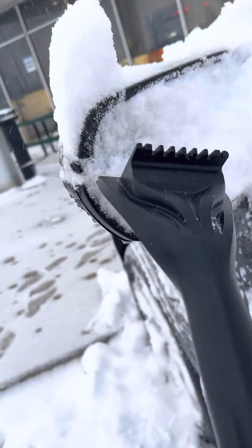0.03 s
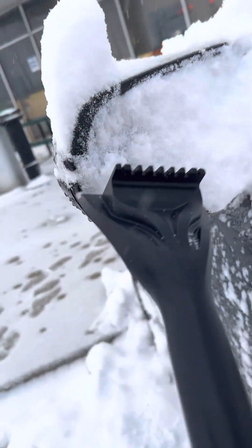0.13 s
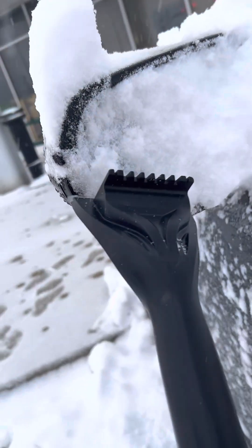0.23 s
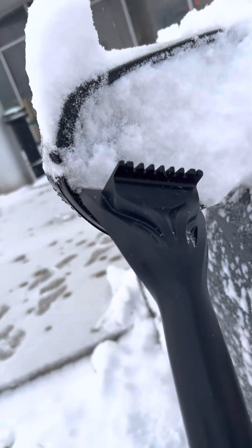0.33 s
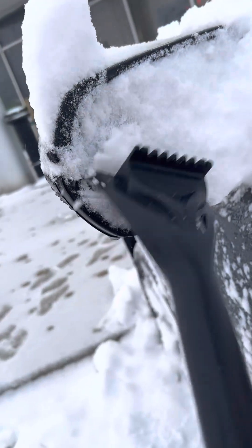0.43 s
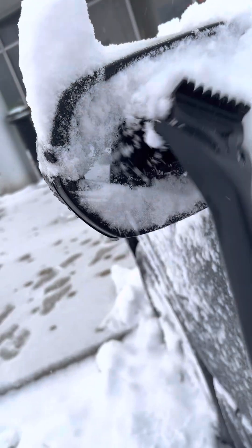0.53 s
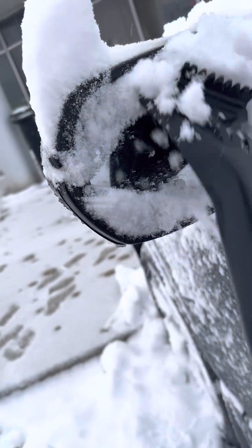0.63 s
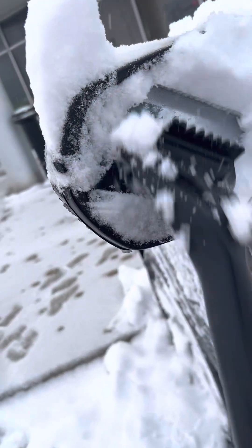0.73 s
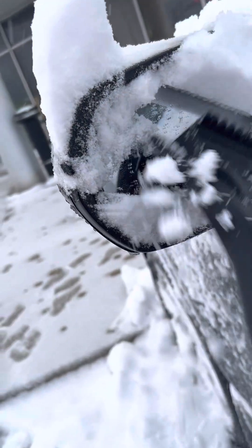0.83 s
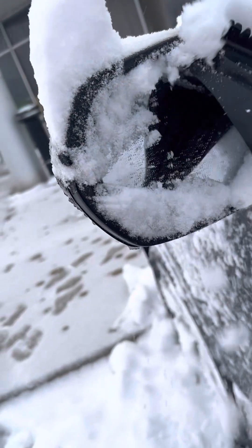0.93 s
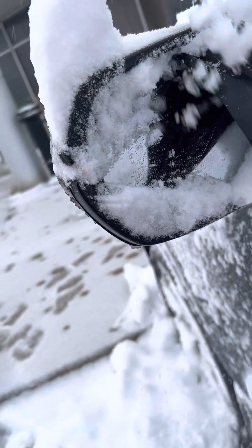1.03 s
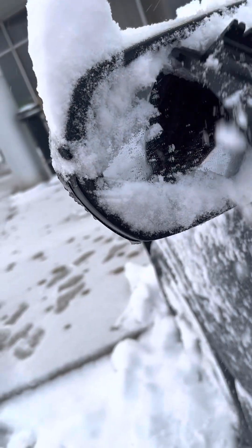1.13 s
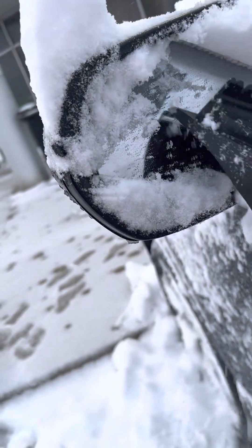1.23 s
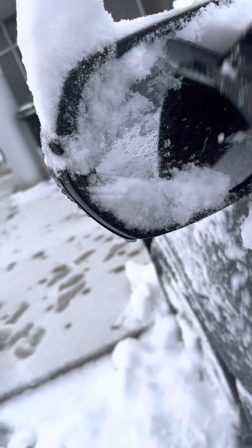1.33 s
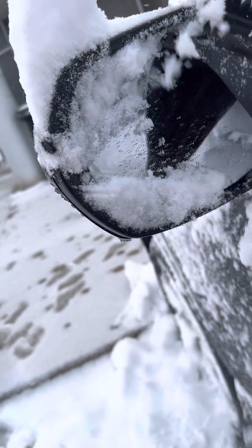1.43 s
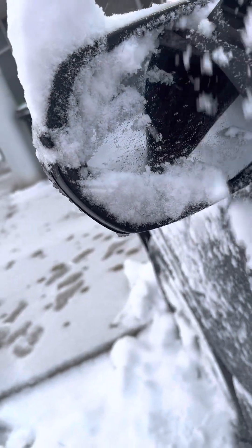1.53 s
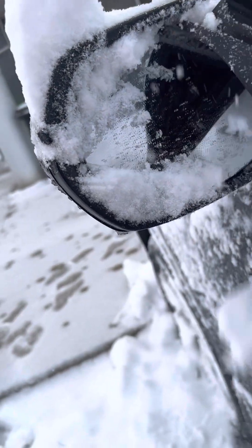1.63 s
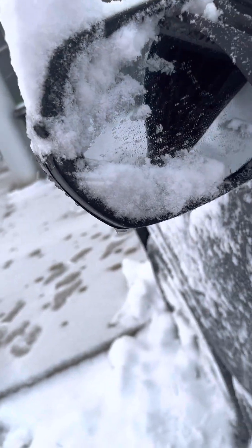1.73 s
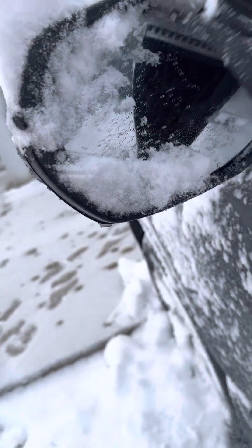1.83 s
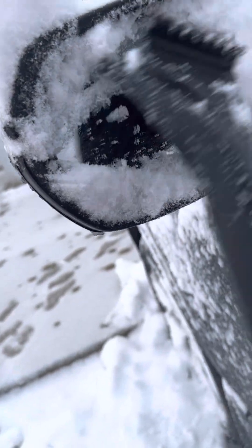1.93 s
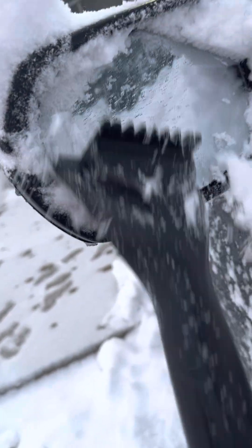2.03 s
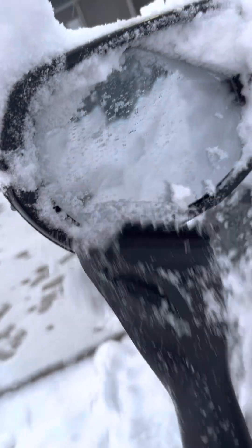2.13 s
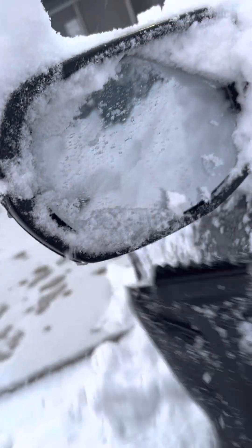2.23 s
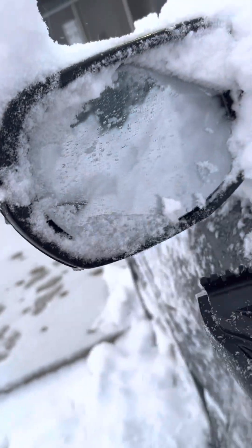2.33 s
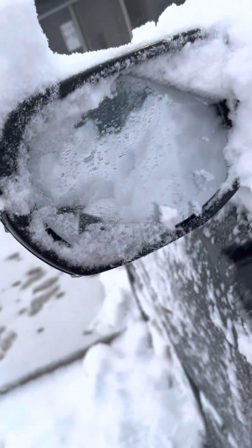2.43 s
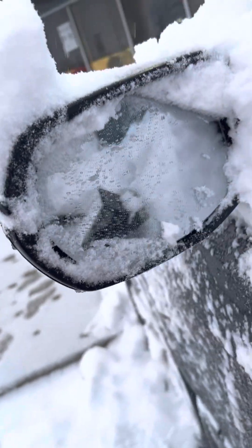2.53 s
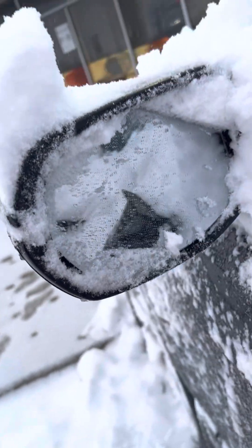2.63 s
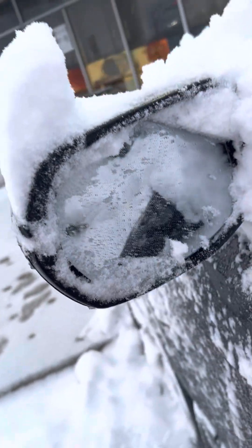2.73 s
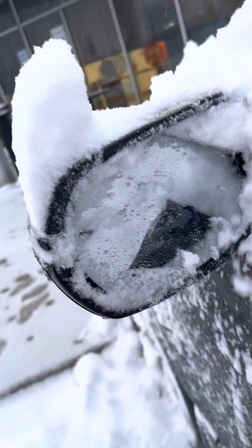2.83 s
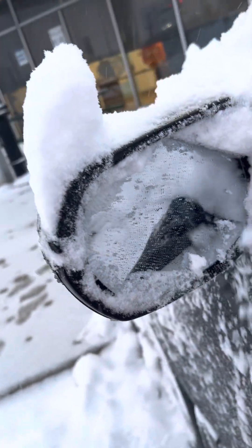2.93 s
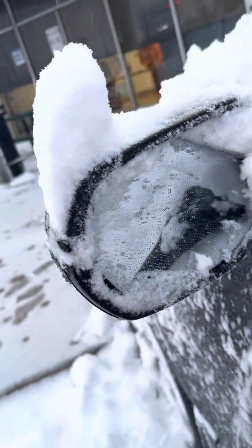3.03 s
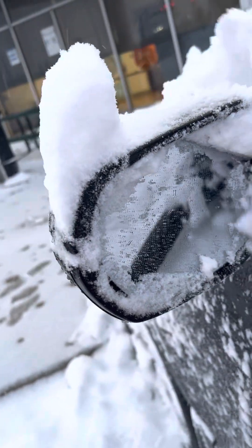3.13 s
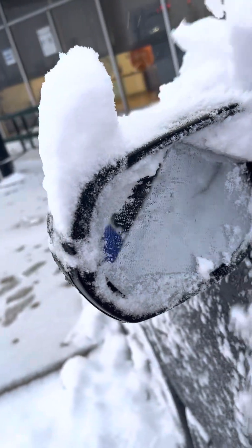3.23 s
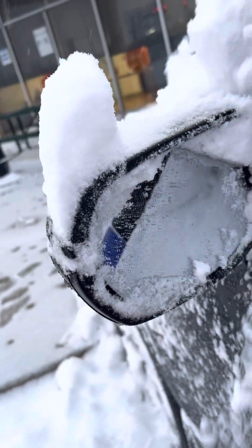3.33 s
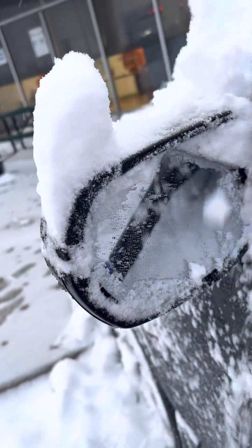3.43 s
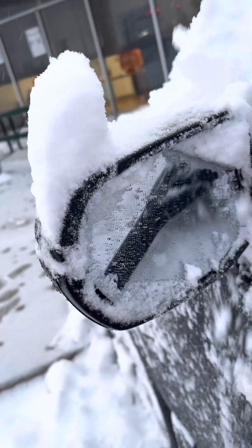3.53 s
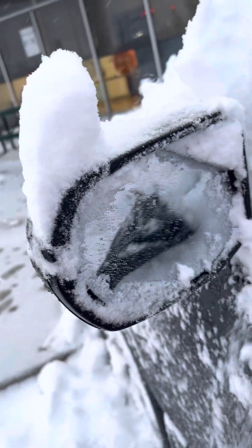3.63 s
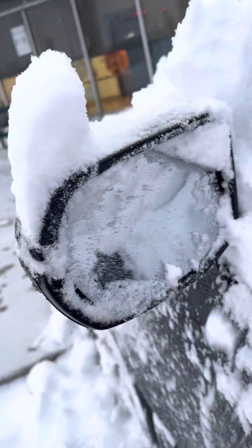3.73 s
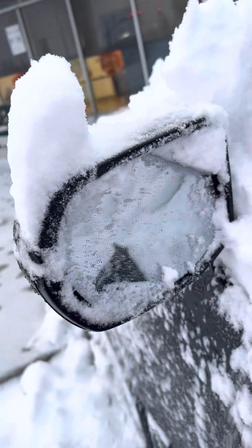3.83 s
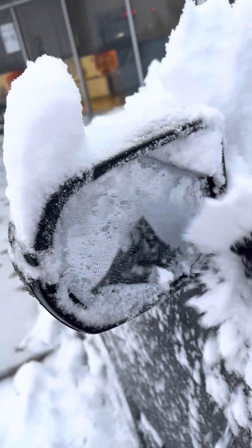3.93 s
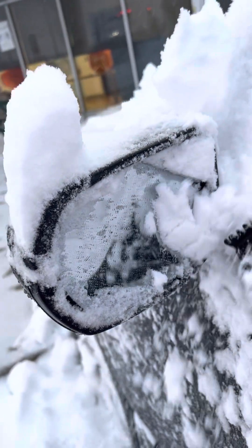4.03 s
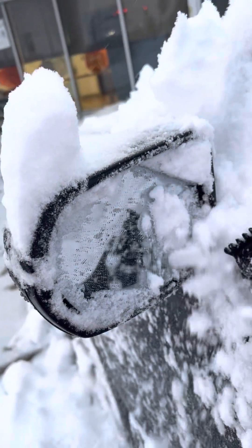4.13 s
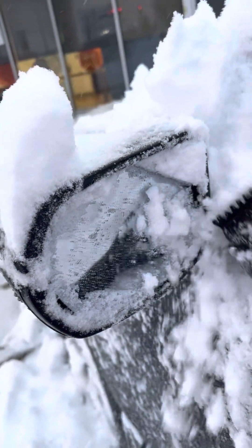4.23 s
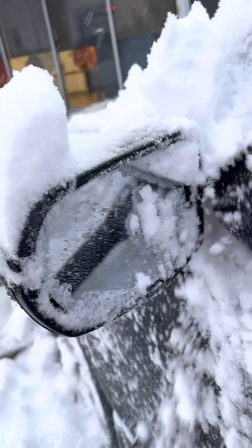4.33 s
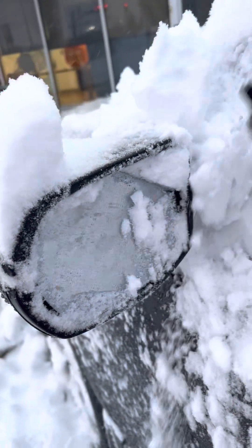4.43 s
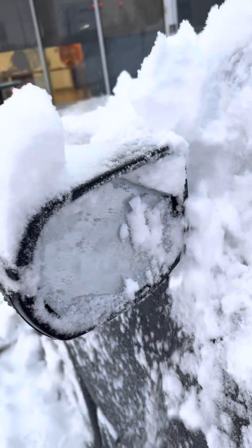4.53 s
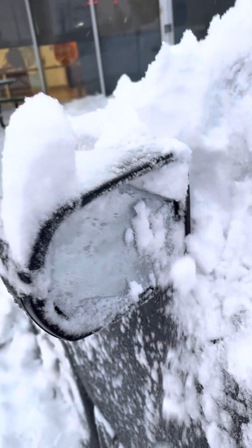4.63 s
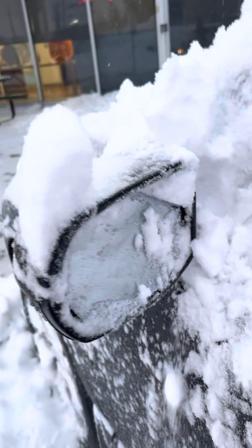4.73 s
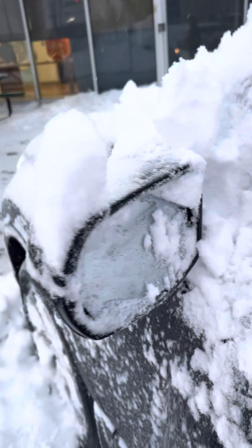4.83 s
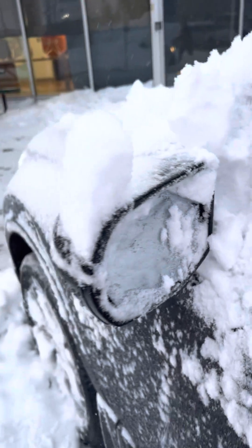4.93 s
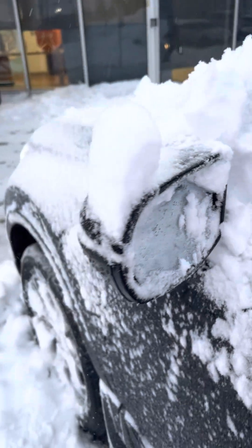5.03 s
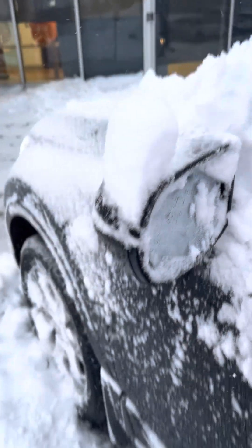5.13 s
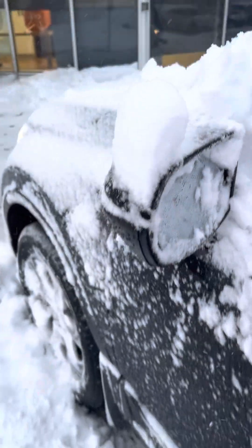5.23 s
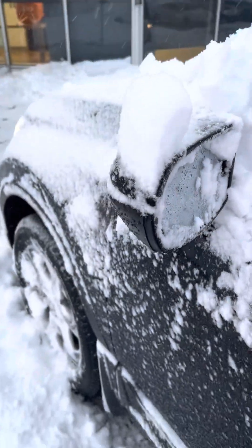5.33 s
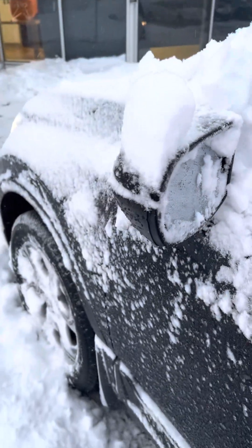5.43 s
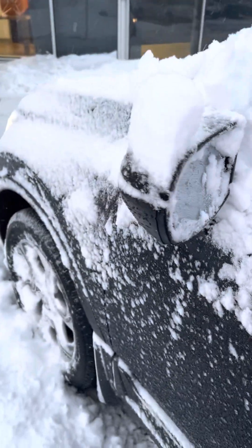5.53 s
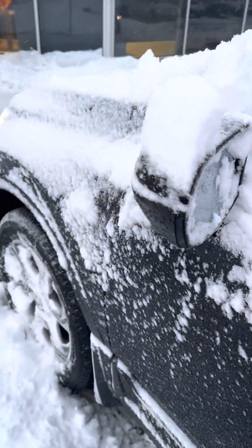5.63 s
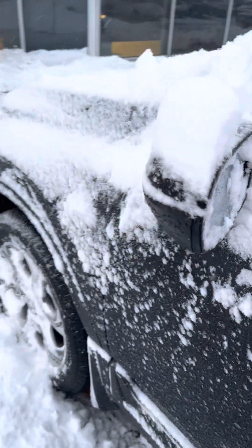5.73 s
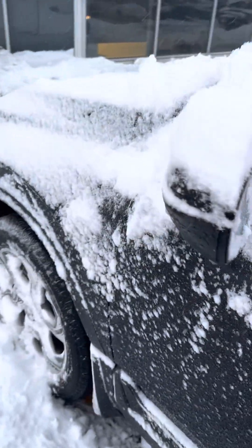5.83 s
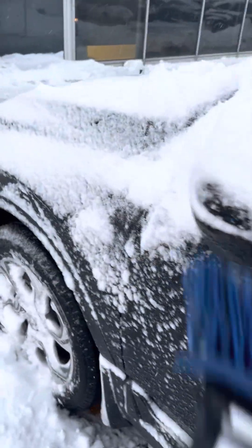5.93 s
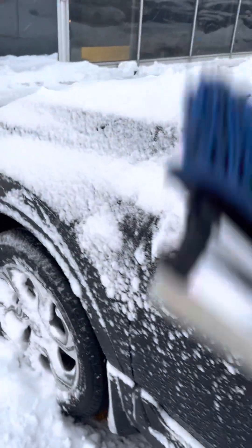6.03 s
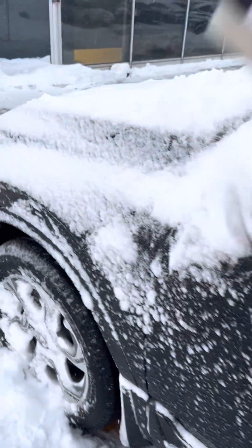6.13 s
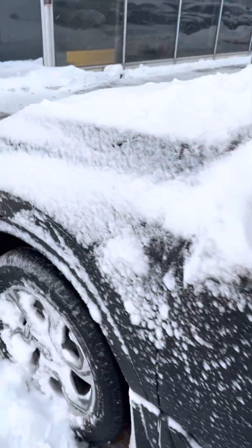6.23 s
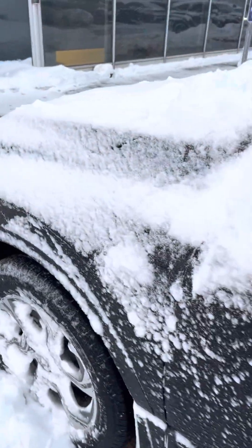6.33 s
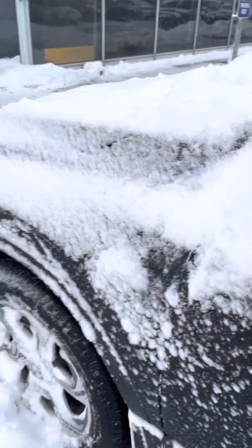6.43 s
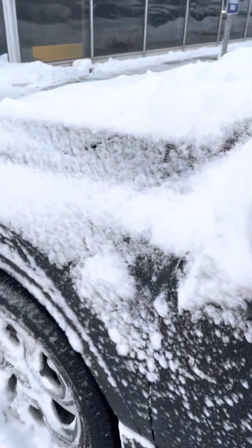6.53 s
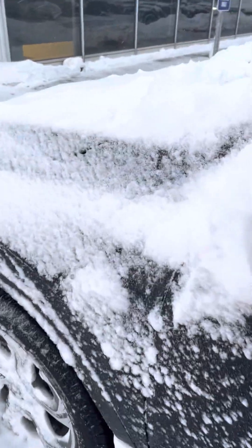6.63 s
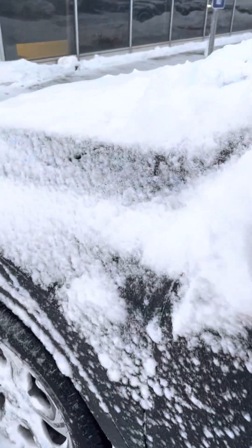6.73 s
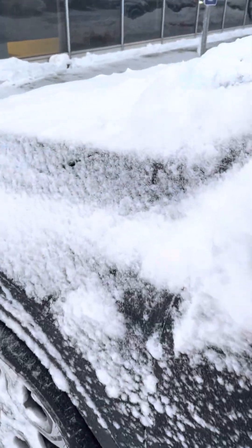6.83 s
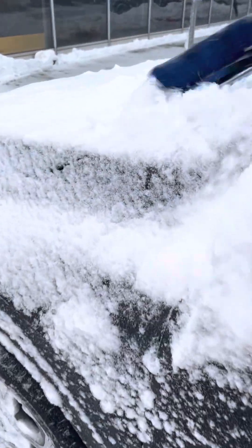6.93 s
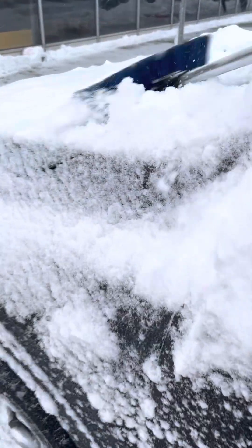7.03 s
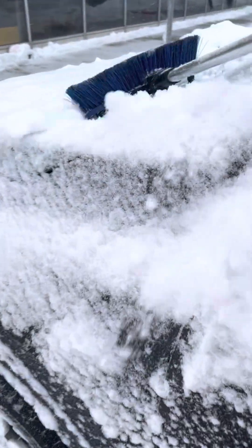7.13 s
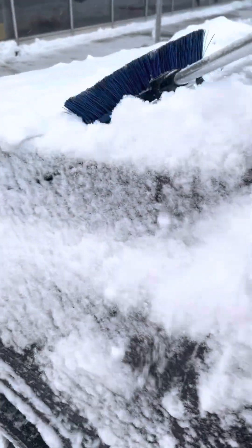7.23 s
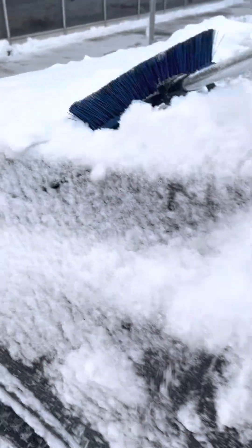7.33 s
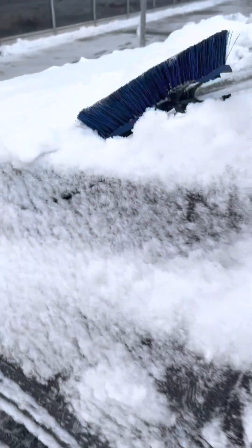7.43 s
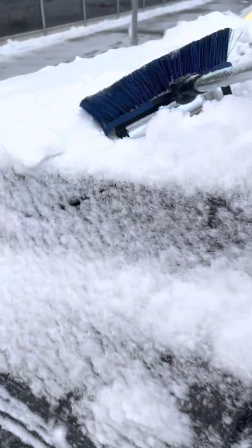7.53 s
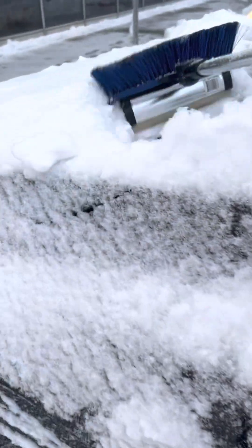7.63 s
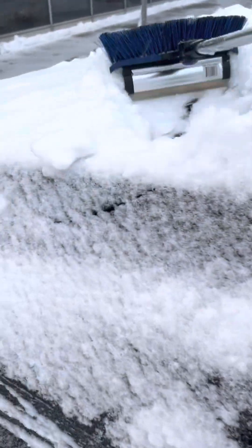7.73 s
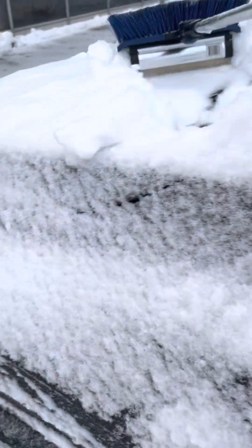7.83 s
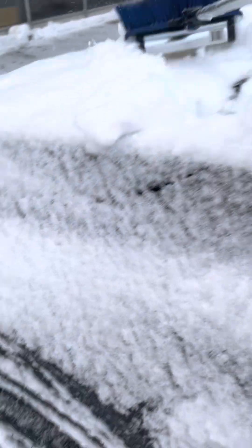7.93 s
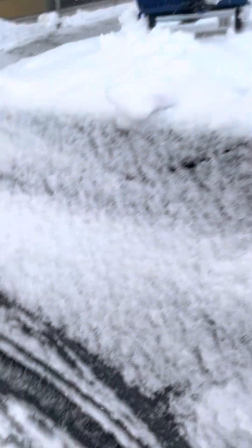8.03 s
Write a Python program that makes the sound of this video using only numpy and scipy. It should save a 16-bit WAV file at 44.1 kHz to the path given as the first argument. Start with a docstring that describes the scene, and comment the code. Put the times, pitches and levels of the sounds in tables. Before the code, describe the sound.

Outdoors, close and wide, over a faint steady murmur of distant traffic. From about 0.2 s small ticks and a light knock lead into short gritty rasps of a plastic scraper on a frosty mirror. Stronger strokes come at 0.8-1.4 s, with cracks, hollow housing taps and low panel thuds. After a lighter patch, the loudest burst arrives at 2.0-2.3 s: hard sharp scrapes with ringing blade tone and a solid knock. Varied rasps, snow crunch and thumps continue from 2.5 to 4.3 s, the last ones brighter and trailing off. From 4.5 to 5.9 s it is nearly quiet, with a few tiny ticks, then soft low bumps. From 6.3 s a brush hisses dully through soft snow, most clearly at 6.6-7.0 s. Deep thumps and panel rumble swell around 7.0-7.5 s, with fainter sweeps until about 8 s.

```python
"""Clearing a snowy car

A plastic scraper rasps frost off a side mirror: fracture noise excites blade resonances and the housing.
Short ticks and snags (swelling noise bursts) and knocks (a short crack, a hollow tap, panel modes) join in.
A brush then hisses through soft snow on the bonnet and bumps the panel. The panels rumble and far traffic
murmurs as shaped noise. The stereo image is wide, with a fixed phase difference between left and right."""
import sys
import numpy as np
from scipy import signal
from scipy.fft import rfft, irfft, next_fast_len
from scipy.io import wavfile
from scipy.ndimage import uniform_filter1d, map_coordinates

SR = 44100
rng = np.random.default_rng(int(sys.argv[2]) if len(sys.argv) > 2 else 0)


def store_pcm(level_fs):
    """Save levels as 16-bit WAV."""
    pcm = np.round(np.clip(level_fs, -1, 1) * 32767).astype(np.int16)
    wavfile.write(sys.argv[1], SR, np.atleast_2d(pcm).T)


N = 356239


def amp(db):
    """Decibels to gain."""
    return 10 ** (np.asarray(db) / 20)


def unit(x):
    """Scale to rms 1."""
    return x / np.sqrt(np.mean(x ** 2) + 1e-20)


def colour(points):
    """Gain as a function of frequency from (Hz, dB) points on a log axis."""
    f, db = np.transpose(points)
    return lambda hz: amp(np.interp(np.log(hz + 1), np.log(f), db))


def filtered(x, response):
    """Apply a complex frequency response to x."""
    m = next_fast_len(x.shape[-1] + 8192)
    spectrum = rfft(x, m) * response(np.fft.rfftfreq(m, 1 / SR))
    return irfft(spectrum, m)[..., :x.shape[-1]]


def gains(rows):
    """One gain per sample for each dB column, silent outside the rows."""
    s, *columns = np.transpose(rows)
    t = np.arange(N) / SR
    levels_db = [np.interp(t, s, c, left=-np.inf, right=-np.inf) for c in columns]
    return np.array([uniform_filter1d(amp(db), size=350) for db in levels_db])


def wobble(rate):
    """A smooth random curve, rate knots a second."""
    knots = rng.standard_normal(int(N * rate / SR) + 4)
    return map_coordinates(knots, [np.arange(N) * rate / SR])


def add(track, s, sound):
    """Mix a sound into the track at time s."""
    part = track[max(round(s * SR), 0):][:len(sound)]
    part += sound[:len(part)]


def resonance(hz, centre, width):
    """Response of one damped mode, 1 at its centre."""
    return 1j * hz * width / (centre ** 2 - hz ** 2 + 1j * hz * width)


def fractures(rate, spread_db, hiss):
    """Tiny breaks of random size at random moments, over a smooth hiss."""
    happens = rng.random(N) < rate / SR
    size = amp(spread_db * np.minimum(rng.standard_normal(N), 2.3))
    sign = np.sign(rng.standard_normal(N))
    return unit(unit(happens * size * sign) + hiss * rng.standard_normal(N))


def patches(x, gain, size, order):
    """Multiply x's spectrogram by gain(field), a random field smoothed over size bins and order frames."""
    z = signal.stft(x, nperseg=512)[2]
    field = rng.standard_normal(z.shape)
    for _ in range(2):
        field = uniform_filter1d(uniform_filter1d(field, size, axis=0), order, axis=1)
    return signal.istft(z * gain(unit(field)), nperseg=512)[1][:N]


def wandering(x, depth_db):
    """The contact points creep along the tool's edge, so narrow bands come and go at random."""
    return patches(x, lambda field: unit(amp(depth_db * field)), size=3, order=6)


TOUCH_SHARE, LIFT_SHARE = 0.23, 0.19  # share of the push spent settling, of the ease spent leaving
CRUMBLE_DB, CRUMBLE_S = -25, 0.024  # crumbs trickling after the tool: level, time constant


def pressure(rows, shape):
    """Two gains: each stroke touches down, swells, slackens, lifts and leaves loosened crumbs trickling."""
    touch_db, lift_db, curvature = shape
    track = np.zeros((2, N))
    for s, push_s, ease_s, high_db, low_db, *_ in rows:
        t = np.arange(round((push_s + ease_s) * SR)) / SR
        pushing = t < push_s
        from_peak = np.abs((t - push_s) / np.where(pushing, push_s, ease_s))
        slack_db = np.where(pushing, touch_db, lift_db) * from_peak ** curvature
        contact = np.clip((1 - from_peak) / np.where(pushing, TOUCH_SHARE, LIFT_SHARE), 0, 1)
        add(track[0], s, contact * amp(high_db - slack_db))
        add(track[1], s, contact * amp(low_db - slack_db))
    keep = np.exp(-1 / (CRUMBLE_S * SR))
    crumbs = signal.lfilter([1 - keep], [1, -keep], track)
    return np.hypot(track, amp(CRUMBLE_DB) * crumbs)


# Murmur spectrum. Each row: frequency in Hz, relative density in dB.
TRAFFIC_SPECTRUM = [(20, -4), (50, -4), (110, 0), (180, -3.5), (280, -9), (500, -15), (900, -17),
                    (1600, -18.5), (2400, -24), (3300, -33), (5300, -33.5), (7200, -37.5), (10000, -43),
                    (15600, -38.5)]
# Difference between left and right. Each row: frequency in Hz, side level relative to mid in dB.
TRAFFIC_SIDE = [(60, -39), (250, -18.5), (650, -4), (1600, -17), (3200, -5), (5100, -1), (6500, -30),
                (9500, -4), (12400, -40)]


def traffic(level_db):
    """A nearly steady far murmur of shaped noise, a little different left and right."""
    mid, side = filtered(rng.standard_normal((2, N)), colour(TRAFFIC_SPECTRUM))
    pair = unit(mid + np.outer([1, -1], filtered(side, colour(TRAFFIC_SIDE))))
    return amp(level_db + 0.57 * wobble(2.767)) * pair


# Panel rumble spectrum. Each row: frequency in Hz, relative density in dB.
RUMBLE_SPECTRUM = [(20, -34), (45, 2.5), (70, 3), (130, -3), (190, -5.5), (300, -17.5), (700, -27),
                   (3000, -84)]
# Rumble under the moving tool. Each row: time in seconds, relative level in dB.
DRUMMING_LEVEL = [(0.0, -43.5), (0.34, -39), (0.65, -41), (1.57, -34), (1.71, -38), (1.93, -37),
                  (2.16, -34), (2.27, -37), (5.44, -46), (7.11, -29.5), (7.45, -29), (8.08, -35)]


def drumming(side_db):
    """The body panels rumble unevenly as the tool is worked: low noise with a wobbling level."""
    mid, side = (unit(filtered(rng.standard_normal(N), colour(RUMBLE_SPECTRUM))) for _ in range(2))
    level = amp(-0.5 + 3.5 * wobble(13)) * gains(DRUMMING_LEVEL)[0]
    return level * (mid + np.outer([1, -1], amp(side_db) * side))


# Modes of the housing and door skin. Each row: nominal frequency in Hz, relative level in dB.
PANEL_MODES = [(58, -5.5), (76, 2), (110, 2), (138, -2.5), (178, 0.5), (255, -3.5), (390, -5), (520, -4)]
# Soft pushes on mirror and body. Each row: start in seconds, peak in dB, centre in Hz.
SOFT_PUSHES = [(1.089, -12.5, 75), (1.54, -19.5, 90), (1.629, -23, 131), (1.681, -21, 89),
               (2.234, -12.5, 146), (3.885, -16, 175), (5.93, -24, 76), (6.2, -21, 87),
               (6.967, -14.5, 77.5), (7.069, -15.5, 305), (7.185, -29, 314), (7.316, -14.5, 78),
               (7.386, -15.5, 74), (8.044, -22, 167)]
# Hard contacts. Each row: time in seconds, relative crack level in dB, relative knock level in dB,
# knock pitch in Hz, panel thud peak in dB, thud pitch in Hz.
HARD_KNOCKS = [ (0.191, -5.5, -13.5, 555, -30, 152), (0.348, -10.5, -21.5, 474, -34, 130),
               (0.408, -12.5, -23.5, 300, -34, 100), (0.9346, -0.5, -12.5, 327, -17.5, 149),
               (1.2332, -0.5, -21.5, 440, -15.5, 100.4), (1.3616, -3.5, -11, 346, -21, 202),
               (1.3849, -4, -13.5, 324, -19.5, 198), (1.4589, -7.5, -24.5, 286, -15.5, 106),
               (1.9893, 4.5, -9, 493, -17.5, 207), (2.1131, -6, -19.5, 330, -40, 202),
               (2.1624, -4.5, -18.5, 420, -45, 198), (2.258, -2.5, -15, 520, -8.5, 211),
               (2.5073, -13.5, -20, 198, -7, 139.4), (3.024, -9, -22.5, 706, -25, 197),
               (3.103, -26, -23, 646, -39, 201), (3.1539, -8.5, -15.5, 346, -23.5, 206),
               (3.2625, -13, -36.5, 200, -16, 111), (3.46, -7.5, -18, 417, -29, 132),
               (3.8572, -5, -17.5, 314, -8.5, 141), (3.922, -26, -23, 550, -17.5, 187),
               (3.9616, -20, -20, 885, -20.5, 202), (4.236, -25, -20.5, 570, -39, 178),
               (6.6072, -11.5, -24, 310, -24, 110), (7.0638, -9, -11.5, 320, -11.5, 85),
               (7.5478, -18, -25.5, 265, -20, 103)]
THUD_LAG_CYCLES, THUD_T60_S = 1.666, 0.12  # the panel gives way just after a knock, later when low


def thuds(octaves, attack_s):
    """Every knock or soft push wakes the damped panel modes near its own pitch."""
    track, t = np.zeros(N), np.arange(SR // 3) / SR
    hz, mode_db = np.transpose(PANEL_MODES)
    after_knocks = [(s + THUD_LAG_CYCLES / centre_hz, db, centre_hz)
                    for s, *_, db, centre_hz in HARD_KNOCKS]
    for s, peak_db, centre_hz in SOFT_PUSHES + after_knocks:
        detune, chance = rng.standard_normal((2, len(hz)))
        nearness = np.exp(-(np.log2(hz / centre_hz) / octaves) ** 2)
        weight = amp(mode_db + 2.1 * chance) * nearness
        ring = weight @ np.sin(2 * np.pi * np.outer(hz * (1 + 0.047 * detune), t))
        ring *= amp(-60 * t / THUD_T60_S) * (1 - np.exp(-t / attack_s))
        add(track, s, amp(peak_db) * ring / np.abs(ring).max())
    return track


# Brush strokes over the bonnet. Each row: start in seconds, push in seconds, ease in seconds,
# relative bristle hiss level in dB, relative pushed snow level in dB.
BRUSH_SWEEPS = [(6.33, 0.083, 0.22, -59, -45.5), (6.604, 0.0067, 0.049, -44, -35),
                (6.705, .12, 0.31, -43, -36.5), (7.12, 0.058, 0.29, -57.5, -44.5),
                (7.5, 0.041, 0.24, -50, -40.5), (7.77, 0.07, 0.24, -53.5, -43.5)]
# Sweep envelope: dB below the peak at first touch, dB below it at lift-off, curvature.
SWEEP_ENVELOPE = (2.3, 3.7, 0.54)
# Bristle hiss spectrum. Each row: frequency in Hz, relative density in dB.
BRISTLE_SPECTRUM = [(500, -34), (1800, -2), (2600, 5), (3400, -3), (4400, 2.5), (5500, 0.5), (7800, 2),
                    (9500, -5.5), (11500, 1.5), (15600, -18)]
# Crushed snow spectrum. Each row: frequency in Hz, relative density in dB.
SNOW_SPECTRUM = [(80, -23), (200, -1.5), (400, 0), (700, 2), (1100, -3.5), (1500, -2.5), (2000, -16),
                 (3500, -15), (9000, -49)]


def brush():
    """Many fine bristles hiss through soft snow: dense fractures, bright for hair and dull for snow."""
    hiss_gain, snow_gain = pressure(BRUSH_SWEEPS, SWEEP_ENVELOPE)
    hiss = unit(filtered(fractures(rate=4200, spread_db=11.5, hiss=1.0), colour(BRISTLE_SPECTRUM)))
    snow = unit(filtered(fractures(rate=1200, spread_db=4.5, hiss=0.88), colour(SNOW_SPECTRUM)))
    return amp(0.41 * wobble(60)) * (amp(2.5) * hiss_gain * hiss + amp(-1.5) * snow_gain * snow)


# Hollow mirror housing. Each row: frequency in Hz, gain in dB.
HOUSING_GAIN = [(150, 7), (280, 3.5), (380, 0), (520, -2), (680, -6.5), (1000, -5), (1450, -1),
                (2000, -3.5), (3500, -0.5), (8000, -40)]


def housing(hz, lag_cycles):
    """Housing colour with a delay that grows towards the lows, so a tap sweeps downwards."""
    return colour(HOUSING_GAIN)(hz) * np.exp(-2j * np.pi * lag_cycles * np.log(hz + 1))


def knock(centre_hz, octaves):
    """One tap on the housing: a band around centre_hz, lifted by a cavity resonance."""
    hz = np.fft.rfftfreq(SR // 2, 1 / SR) + 1
    band = 1 / (1 + (np.log2(hz / centre_hz) / octaves) ** 2) / (1 + (60 / hz) ** 4)
    cavity = 1 + amp(2.0) * resonance(hz, centre_hz, 31)
    phase = np.exp(2j * np.pi * rng.random())
    wave = irfft(band * cavity * housing(hz, lag_cycles=2.1) * phase)
    return wave / np.abs(wave).max()


# Crack spectrum. Each row: frequency in Hz, relative density in dB.
CRACK_SPECTRUM = [(300, 8.5), (900, 8), (1500, 1.5), (2800, 0), (5000, -2.5), (8000, -8.5), (15600, -12)]


def knocks():
    """Each hard contact gives a short noise crack and a hollow knock."""
    track, t = np.zeros(N), np.arange(SR // 20) / SR
    envelope = amp(-60 * t / 0.038) * (1 - np.exp(-t / 0.00024))
    for s, crack_db, knock_db, pitch_hz, *_ in HARD_KNOCKS:
        crack = filtered(rng.standard_normal(len(t)) * envelope, colour(CRACK_SPECTRUM))
        add(track, s, amp(crack_db - 9) * crack / np.abs(crack).max())
        add(track, s, amp(knock_db + 2.5) * knock(pitch_hz, octaves=0.64))
    return track


# Plastic blade modes. Each row: frequency in Hz, width in Hz, relative level in dB.
BLADE_MODES = [(2393, 175, 0), (2785, 91, 8), (2954, 49, 3.5), (3274, 100, 4), (3710, 7.9, 5),
               (3950, 36, 10.5), (4540, 92, -4), (5700, 130, 9), (6020, 33, -5), (7450, 61, 6),
               (7600, 250, -3.5), (10770, 95, 9)]


def blade(hz):
    """The blade's resonances, alternating in sign."""
    return sum((-1) ** k * amp(db) * resonance(hz, centre_hz, width_hz)
               for k, (centre_hz, width_hz, db) in enumerate(BLADE_MODES))


# Frost spectrum. Each row: frequency in Hz, relative density in dB.
FROST_SPECTRUM = [(300, -18), (1500, -2), (2400, -2.5), (3500, 1), (5000, 1.5), (7000, 2.5), (9500, -1.5),
                  (12000, 5), (14000, -4), (15600, 0)]


def rasp(breaks, ring_db):
    """Breaks are heard directly, with the colour of frost, and through the blade's resonances."""
    direct = unit(filtered(breaks, colour(FROST_SPECTRUM)))
    return unit(direct + amp(ring_db) * unit(filtered(breaks, blade)))


# Ticks and snags. Each row: start in seconds, length in seconds, relative level in dB.
TICKS_AND_SNAGS = [(0.207, .0074, -29), (0.251, 0.0083, -36.5), (0.293, 0.0032, -37.5),
                   (0.332, 0.0045, -29), (0.394, 0.0085, -22.5), (0.84, 0.016, -19.5), (1.232, 0.0048, -17),
                   (1.371, 0.024, -19.5), (1.574, 0.0031, -35), (1.614, 0.0056, -28.5), (2.068, 0.016, -24),
                   (2.272, 0.01, -22), (2.502, 0.011, -21), (2.581, 0.013, -27.5), (2.659, 0.0092, -21),
                   (2.999, .007, -22), (3.259, 0.014, -20), (3.292, .004, -33.5), (3.454, 0.012, -22),
                   (3.814, 0.033, -30), (4.751, 0.0033, -35.5), (5.07, 0.0042, -36.5), (5.38, .012, -48),
                   (5.4, 0.0038, -37.5), (7.066, .007, -24.5), (7.081, 0.0026, -28), (7.1, .005, -29),
                   (7.123, 0.0052, -33)]


def ticks_and_snags():
    """Ice catching on the tool, loose crumbs falling, small clicks; each swells, then stops."""
    swell = np.zeros(N)
    for s, length_s, db in TICKS_AND_SNAGS:
        u = np.linspace(0, 1, max(round(length_s * SR), 8))
        add(swell, s, amp(db) * np.sqrt(u) * (1 - u ** 6))
    breaks = swell * fractures(rate=4000, spread_db=0, hiss=0.23)
    size = np.sqrt(np.mean(breaks ** 2))
    return amp(0.5) * size * rasp(breaks, ring_db=-5.5)


# Scraper strokes on the mirror. Each row: start in seconds, push in seconds, ease in seconds,
# relative frost rasp level in dB, relative snow crunch level in dB, blade ring in Hz, ring level in dB.
SCRAPER_STROKES = [ (0.328, 0.024, .045, -32, -42, 2880, 6), (0.384, 0.098, 0.071, -26.5, -40.5, 2930, -6),
                   (0.54, 0.026, 0.039, -37.5, -41, 2950, -5), (0.615, 0.042, 0.058, -42, -56, 2840, 5),
                   (0.775, 0.14, 0.07, -25.5, -37.5, 5970, 6), (.965, .02, .07, -50, -47, 6000, -8),
                   (1.06, .1, 0.047, -29.5, -37.5, 6000, 0), (1.25, 0.14, 0.018, -29.5, -39, 2600, -2),
                   (1.4, 0.037, .045, -42, -49, 2520, 1), (1.51, 0.062, 0.041, -43, -34, 2480, -6),
                   (1.744, 0.053, 0.031, -32.5, -59, 3150, -2), (1.81, 0.21, .025, -41, -47, 3150, -8),
                   (1.982, 0.028, 0.055, -25, -35, 2720, 6), (2.058, .038, 0.013, -18.5, -24.5, 3050, 15),
                   (2.109, 0.0082, 0.011, -11.5, -20, 2470, 11),
                   (2.149, 0.0055, 0.021, -22.5, -24, 3730, 9), (2.253, 0.01, 0.075, -23.5, -29, 2350, -6),
                   (2.503, 0.0068, 0.069, -32, -32, 8140, 10.5),
                   (2.569, 0.079, 0.047, -27, -39.5, 2370, -5), (2.664, 0.081, 0.089, -30.5, -34, 2280, -2),
                   (2.862, 0.17, 0.11, -30, -30, 4100, -10), (3.055, 0.029, 0.07, -30.5, -29.5, 4220, 4),
                   (3.124, 0.1, 0.088, -29.5, -50, 2520, -5), (3.324, .006, .016, -26, -58, 2520, 10),
                   (3.35, 0.098, 0.046, -37, -50, 2600, 6), (3.48, 0.095, 0.2, -32.5, -36.5, 4400, 3),
                   (3.799, 0.097, 0.074, -30, -26, 7600, 4), (3.969, 0.0074, 0.18, -44, -44.5, 7500, -15),
                   (4.121, .12, 0.052, -29, -30, 8200, -10), (4.275, 0.017, 0.24, -48, -49, 6000, -18)]
UPPER_RING_HZ, UPPER_RING_DB = 5520, -17.5  # the blade's second resonance under load


def gripped(x, low_width_hz, high_width_hz):
    """Each stroke grips the glass anew and shifts the scraping's energy into its own blade resonance."""
    track = np.zeros(N)
    edges = [0] + [row[0] for row in SCRAPER_STROKES[1:]] + [N / SR]
    for (*_, ring_hz, ring_db), s, end in zip(SCRAPER_STROKES, edges, edges[1:]):
        part = np.pad(x[round(s * SR):round(end * SR)], (0, SR // 20))  # room to ring on

        def lift(hz):
            lower = amp(ring_db) * resonance(hz, ring_hz, low_width_hz)
            upper = amp(UPPER_RING_DB) * resonance(hz, UPPER_RING_HZ, high_width_hz)
            return 1 + lower + upper

        add(track, s, unit(filtered(part, lift)) * np.std(part))
    return track


# Stroke envelope: dB below the peak at first touch, dB below it at lift-off, curvature.
SCRAPE_ENVELOPE = (13.3, 11.9, 1.12)


def scraper():
    """The blade sticks and slips over frost while it crushes snow against the housing."""
    frost_gain, snow_gain = pressure(SCRAPER_STROKES, SCRAPE_ENVELOPE)
    slip = unit(amp(1.5 * wobble(70) + 1.8 * wobble(300)))
    grains = rasp(fractures(rate=3000, spread_db=0.5, hiss=0.89), ring_db=-5)
    frost = amp(1.5) * slip * frost_gain * grains
    crush = snow_gain * fractures(rate=600, spread_db=3.5, hiss=0.35)
    crunch = lambda hz: colour(SNOW_SPECTRUM)(hz) * housing(hz, lag_cycles=1.5)
    snow = np.std(crush) * unit(filtered(crush, crunch))
    rubbing = wandering(frost + snow, depth_db=3.2)
    return gripped(rubbing + ticks_and_snags(), low_width_hz=360, high_width_hz=240)


def widening(x):
    """A randomly changing side signal, a quarter turn out of phase, widens the tool's sound."""
    side = patches(x, lambda field: field, size=5, order=10)
    quarter_turn = lambda hz: 1j * hz / (hz + 100) / (1 + (hz / 11000) ** 20)
    return np.outer([1, -1], filtered(side, quarter_turn))


def scene():
    """The tool at work on the car, in the open air."""
    rubbing = scraper() + wandering(brush(), depth_db=2.5) + thuds(octaves=0.72, attack_s=0.0039)
    taps = knocks()
    direct = rubbing + taps * amp([[-1], [1]])  # taps are louder on the right
    width = amp(-12.5) * widening(rubbing + taps)
    return direct + width + drumming(side_db=-20) + traffic(level_db=-39.5)


# Phase between left and right. Each row: frequency in Hz, lead of the left in radians.
STEREO_PHASE = [(0, 0), (300, 0), (750, -.45), (1200, 0), (2100, 0), (2700, -.7), (3900, 0), (4600, -.5),
                (5050, -3.14), (5350, -5.7), (5750, -6.28), (7500, -6.28), (9000, -7), (11500, -8.7),
                (12400, -9.42), (16000, -9.42)]
TOP_HZ = 15800


def record(dry):
    """A fixed phase difference between left and right, growing towards the treble; band-limited at the top."""
    half_phase = lambda hz: np.interp(hz, *np.transpose(STEREO_PHASE)) / 2
    pair = filtered(dry, lambda hz: np.exp(1j * np.outer([1, -1], half_phase(hz))))
    return filtered(pair, lambda hz: hz < TOP_HZ)


dry = scene()
out = record(dry)
store_pcm(out)
```